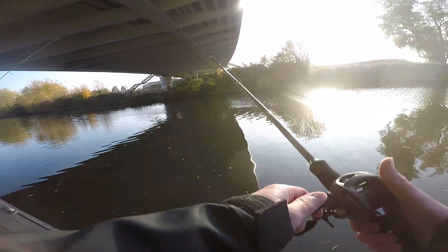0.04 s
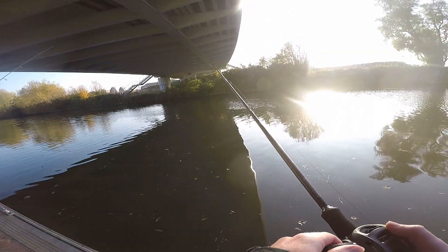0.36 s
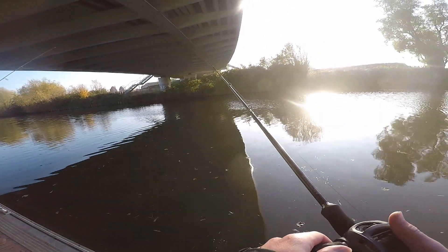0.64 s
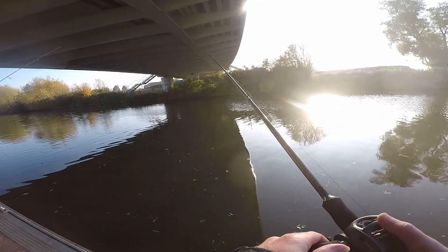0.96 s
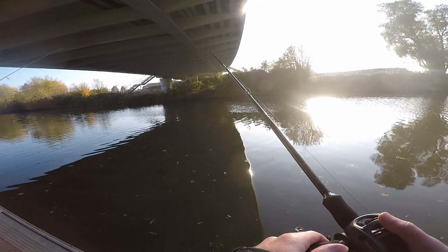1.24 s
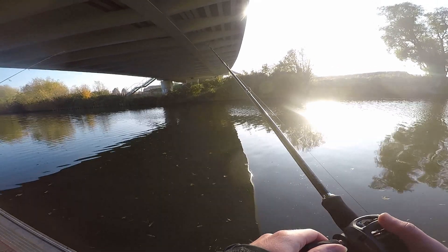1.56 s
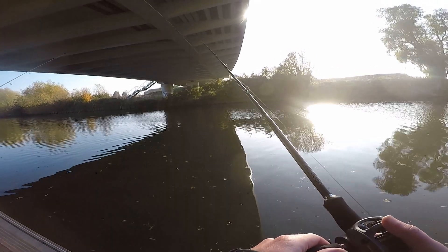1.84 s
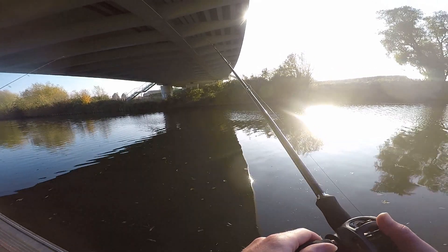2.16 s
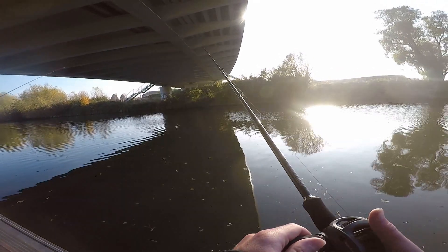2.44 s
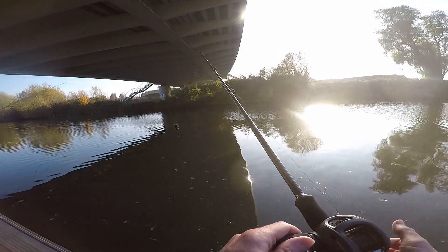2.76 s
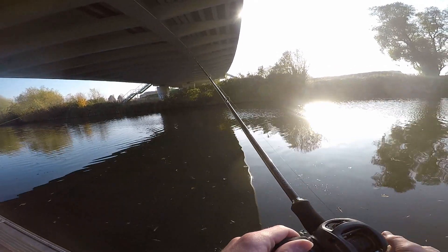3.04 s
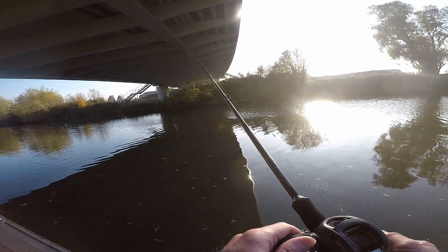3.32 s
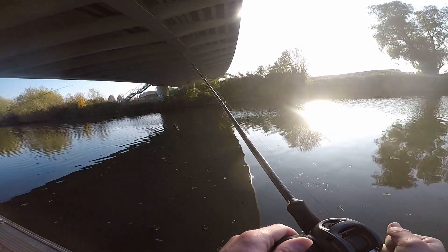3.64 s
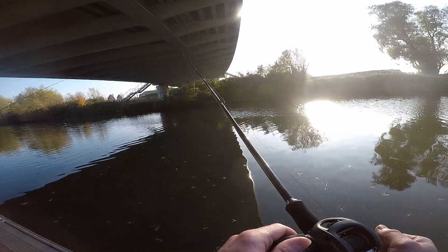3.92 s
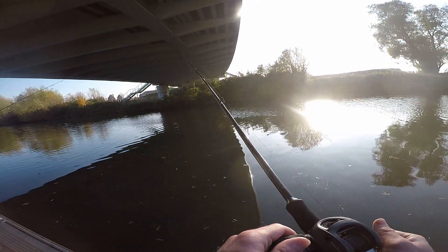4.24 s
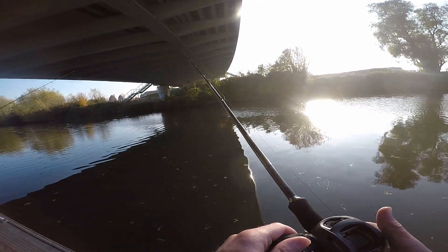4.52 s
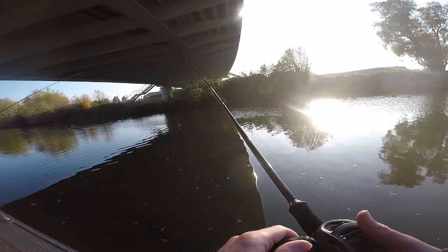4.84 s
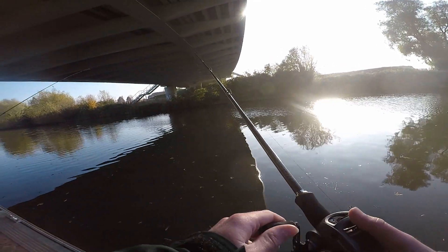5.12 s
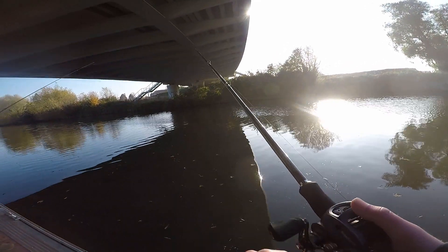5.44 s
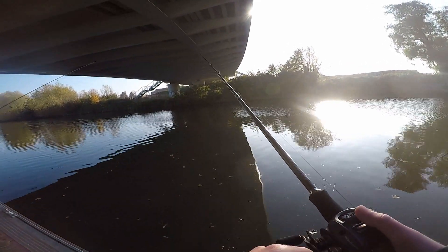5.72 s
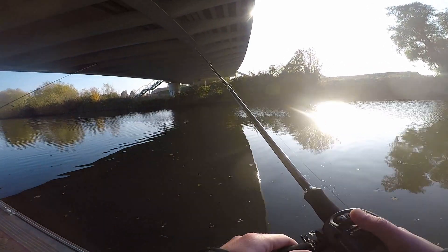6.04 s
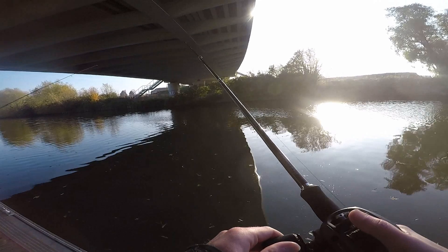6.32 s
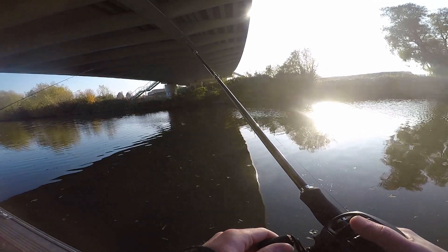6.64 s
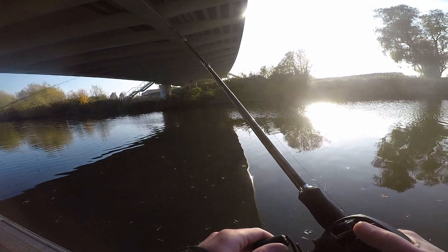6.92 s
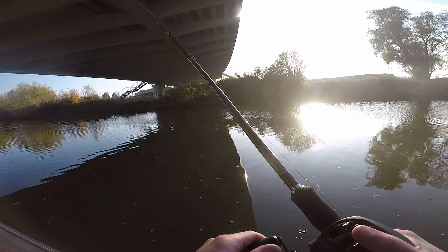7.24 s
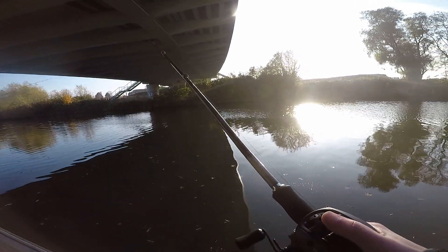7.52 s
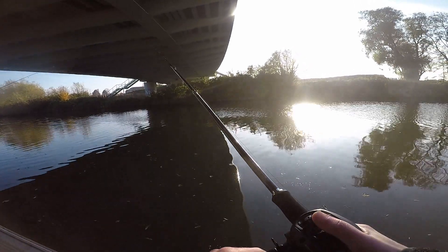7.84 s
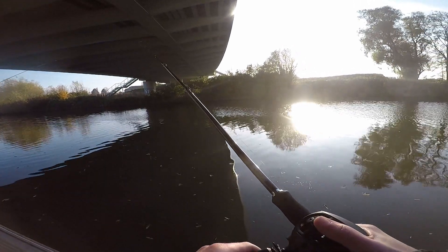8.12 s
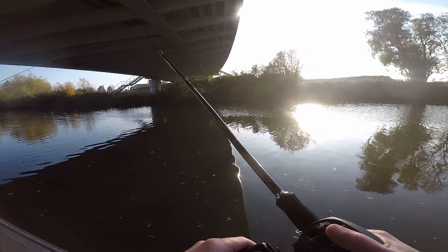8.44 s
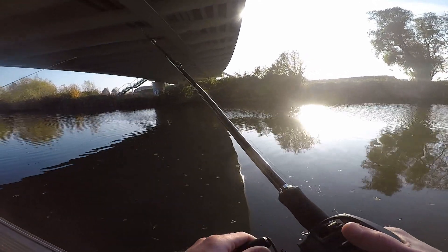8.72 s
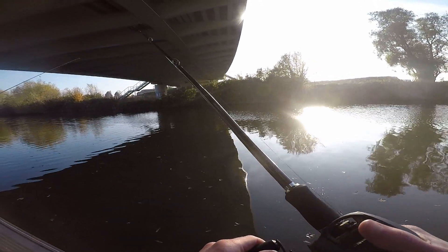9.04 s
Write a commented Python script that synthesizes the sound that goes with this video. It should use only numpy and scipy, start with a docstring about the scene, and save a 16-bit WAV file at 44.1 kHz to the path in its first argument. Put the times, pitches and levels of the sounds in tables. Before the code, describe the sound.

Traffic on a bridge overhead makes a dark, continuous roar, with a wavering low diesel drone and soft buffeting on a body-worn microphone. In the first half second a hand knocks and slides on a fishing rod grip. Small, close reel clicks come near 0.3, 0.8, 1.7, 2 and 2.6 seconds, with faint sleeve rustle until about 6 seconds. From 3 seconds vehicles cross one after another in gentle swells with light tyre hiss, while the diesel growls most around 3 and 6 seconds. A short rub and click come at 5.7 seconds. From 6 to 8 seconds dull thumps and rumble shake the microphone, loudest near 6.9 seconds, making the traffic dip and slowly return. The reel ticks softly around 7.4 to 8.2 seconds. The diesel sinks in pitch and fades as another vehicle passes, with one more thud near 9 seconds.

```python
"""Under a road bridge beside a canal, traffic roars on the deck and a diesel engine drones.
An angler wears the camera: the rod grip knocks, then low buffeting, sleeve rustle and small reel
clicks play close to its two microphone ports. From about 3 s, vehicles cross overhead one by one.
Around 7 s, bumps on the housing push the gain control down, and the traffic slowly creeps back
while the diesel sinks in pitch and leaves."""
import sys
import numpy as np
from scipy import signal
from scipy.fft import rfft, irfft
from scipy.io import wavfile
from scipy.ndimage import uniform_filter1d, minimum_filter1d

SR = 44100
rng = np.random.default_rng(int(sys.argv[2]) if len(sys.argv) > 2 else 0)


def log_audio(samples):
    """Write samples as a 16-bit WAV file to the path given in sys.argv[1]."""
    # one column per channel
    frames = np.atleast_2d(samples).T
    # limit to full scale, then quantise
    limited = np.clip(frames, -1, 1)
    pcm = np.round(limited * 32767).astype(np.int16)
    wavfile.write(sys.argv[1], SR, pcm)


N = 409248
T = np.arange(N) / SR
FREQS_HZ = np.fft.rfftfreq(N, 1 / SR)


def amp(db):
    """Decibels to gain."""
    return 10 ** (np.asarray(db) / 20)


def unit(x):
    """Scales to rms 1."""
    return x / np.sqrt(np.mean(x ** 2) + 1e-20)


def curve_at(points, hz):
    """Reads a curve along a log-frequency axis."""
    freqs, values = np.transpose(points)
    return np.interp(np.log(hz + 1), np.log(freqs + 1), values)


def add(mix, start_s, sound):
    """Lays a sound into the mix."""
    part = mix[..., round(start_s * SR):][..., :sound.shape[-1]]
    part += sound[..., :part.shape[-1]]


def shaped_noise(gains):
    """Mono noise of rms 1, coloured by a gain at each frequency."""
    return unit(irfft(rfft(rng.standard_normal(N)) * gains, N))


def drift(rate_hz):
    """A smooth random wobble of rms 1."""
    return shaped_noise(np.exp(-.5 * (FREQS_HZ / rate_hz) ** 2))


def band(low_hz, high_hz):
    """A noise band of rms 1, unrelated in the two ports."""
    bandpass = signal.butter(2, [low_hz, high_hz], "band", fs=SR, output="sos")
    return unit(signal.sosfilt(bandpass, rng.standard_normal((2, N))))


def eased(gain):
    """Rounds off a gain curve over a few milliseconds."""
    return uniform_filter1d(uniform_filter1d(gain, size=250), size=250)


def bell(peak_s, half_s):
    """A smooth rise and fall, 1 at its peak."""
    return np.exp(-((T - peak_s) / half_s) ** 2)


def swells(rows, rest_db):
    """Gain of bell-shaped swells over a resting level; their powers add."""
    power = sum((amp(db) * bell(peak_s, half_s)) ** 2 for peak_s, half_s, db in rows)
    return np.sqrt(amp(rest_db) ** 2 + power)


def strike(modes, tilt_db, scuff_s, lowpass_hz, order=4, size=8000):
    """A short scuff rings damped modes; a harder touch tilts them brighter. Peak 1."""
    t = np.arange(size) / SR
    ring = np.zeros(size)
    for hz, db, t60_s in modes:
        decay = amp(db + tilt_db * np.log2(hz) - 60 * t / t60_s)
        ring += decay * np.sin(2 * np.pi * hz * rng.uniform(.96, 1.04) * t)
    push = rng.standard_normal(size) * np.exp(-t / scuff_s) / np.sqrt(SR / 400)
    push[0] = 1  # first contact
    lowpass = signal.butter(order, lowpass_hz, fs=SR, output="sos")
    hit = signal.sosfilt(lowpass, signal.fftconvolve(ring, push)[:size])
    return hit / abs(hit).max()


# how alike the two ports sound: freq_hz, likeness (0-1)
PORT_LIKENESS = [(150, 1), (300, .994), (550, .975), (850, .79), (1500, .67), (2000, .48), (2350, .15),
                 (3000, .62), (4000, .58), (5000, .15), (6200, .4), (10000, .1)]
# phase between the ports: freq_hz, left_lead_rad
PORT_PHASE = [(120, 0), (300, -.12), (620, -.3), (950, 1.35), (1600, 1.7), (2250, 1.4), (2500, -.3),
              (4300, 0), (5200, 2.7), (10000, 2.6)]
# stereo lean: freq_hz, left_minus_right_db
PORT_BALANCE = [(200, 0), (320, -1), (490, -3.5), (740, -10), (1130, -5.5), (1700, 1.8), (2050, 4),
                (2700, .5), (7000, 0), (9000, -3), (13000, 0)]
def airborne(spectrum, patchy_db, size=1024):
    """Noise of rms 1 with drifting patches of colour, as the two ports pick it up."""
    hop, hz = size // 4, np.fft.rfftfreq(size, 1 / SR)
    draws = rng.standard_normal((5, N // hop + 5, len(hz)))
    left, unrelated = draws[0] + 1j * draws[1], draws[2] + 1j * draws[3]
    patches = unit(uniform_filter1d(uniform_filter1d(draws[4], size=14, axis=0), size=7, axis=1))
    likeness = np.clip(curve_at(PORT_LIKENESS, hz), 0, 1)
    right = likeness * left + np.sqrt(1 - likeness ** 2) * unrelated
    right *= np.exp(-1j * curve_at(PORT_PHASE, hz))
    lean = amp(curve_at(PORT_BALANCE, hz) / 2)
    ports = np.array([left * lean, right / lean]) * amp(curve_at(spectrum, hz) + patchy_db * patches)
    _, noise = signal.istft(ports, nperseg=size, noverlap=size - hop, time_axis=1, freq_axis=2)
    return unit(noise[:, :N])


# colour of the noise floor: freq_hz, level_db
HISS_EQ = [(1000, -6), (5000, -0.5), (8000, 4.5), (10000, 1.5), (11300, -5), (12500, -12), (14000, -33)]
def electronics(frame_hz=59.94, whine_hz=8515):
    """The camera hisses, and a thin fuzzy whine pulses once per picture frame, mostly on the right."""
    pulse = (.5 + .5 * np.cos(2 * np.pi * frame_hz * T)) ** 2
    whine = unit(pulse * np.sin(2 * np.pi * whine_hz * T + 1.3 * drift(45)))
    return amp([[-80], [-65.5]]) * whine + amp(-62) * airborne(HISS_EQ, patchy_db=0)


# colours of the deck's roar, the tyre wash and the tread hiss: freq_hz, level_db
ROAR_EQ = [(60, 3), (140, -4), (200, -2), (270, -1.5), (370, -1.5), (490, -1), (580, -7), (800, -22.5),
           (1100, -37), (2300, -42.5), (9000, -75)]
TYRE_EQ = [(400, 2.5), (800, 6.5), (1100, 0), (1400, -3.5), (1800, -7.5), (2350, -20), (3200, -25),
           (4500, -38.5), (9000, -49)]
TREAD_EQ = [(900, 1), (1800, 7), (2350, -3.5), (3100, -1.5), (3700, -6), (4400, -10), (8000, -20.5),
            (12000, -38)]
# vehicles crossing overhead: nearest_s, roar_db, tyre_db, tread_db
PASS_BYS = [(2.95, -26, -47.5, -56.5), (4.05, -26.5, -53.5, -55), (5.1, -26.5, -51.5, -50),
            (5.901, -23, -47, -49), (7.5, -23, -47, -50.5), (8.821, -20, -44.5, -58.5)]
def traffic(distance_m=7.44, speed_m_per_s=15.1):
    """The deck radiates a dark roar that swells as each vehicle nears; tyres spill over the parapet."""
    power = amp([[-25.5], [-37], [-72.5]]) ** 2  # steady roar, tyres and tread further along the road
    for nearest_s, *levels_db in PASS_BYS:
        nearness = distance_m / np.hypot(distance_m, speed_m_per_s * (T - nearest_s))
        power = power + np.outer(amp(levels_db), nearness) ** 2
    roar, tyres, tread = np.sqrt(power)
    return (roar * airborne(ROAR_EQ, patchy_db=1)
            + tyres * airborne(TYRE_EQ, patchy_db=-.05)
            + tread * airborne(TREAD_EQ, patchy_db=1.7))


# level ride of the drone's two notes: time_s, lower_db, upper_db
DRONE_RIDE = [(0, -21, -30), (.4, -20, -28), (.55, -20, -19), (1.4, -18, -23), (2.5, -16.5, -23.5),
              (3.4, -16.5, -20), (4.15, -14.5, -21.5), (4.6, -17.5, -17), (5.15, -18, -14),
              (5.8, -16.5, -17.5), (6.3, -19, -26), (8.1, -20, -27), (9.25, -34, -38)]
# brief dips in one note: centre_s, half_length_s, gain_db, engine_order
DRONE_DIPS = [(1.25, .06, -8, 3), (1.65, .1, -12, 4), (1.93, .08, -12, 4), (2.5, .1, -15, 4),
              (2.78, .06, -7, 3), (3.05, .12, -13, 3), (3.65, .1, -12, 4), (3.9, .07, -15, 3),
              (4.85, .08, -7, 4), (5.05, .09, -14, 3), (5.35, .13, -20, 3), (5.45, .04, -5, 4),
              (5.69, .04, -7, 4), (6, .09, -10, 3), (6.2, .15, -13, 4)]
def diesel_drone(cycle_phase, orders=(3, 4), waver_db=2.1):
    """Two low engine orders; echoes make each swell and fade as the diesel moves along the deck."""
    times_s, *rides_db = np.transpose(DRONE_RIDE)
    out = np.zeros(N)
    for order, ride_db in zip(orders, rides_db):
        dip_db = sum(db * bell(s, half_s) for s, half_s, db, note in DRONE_DIPS if round(note) == order)
        gain = amp(np.interp(T, times_s, ride_db) + dip_db + waver_db * drift(4.5))
        out += gain * np.sin(order * cycle_phase + .4 * drift(5.5))
    return out


# overtones of the diesel: engine_order, level_db
GROWL_PARTIALS = [(6, -9), (7, -1), (8, -1.5), (9, -7), (12, -4.5), (16, -8)]
# swells of the growl: peak_s, half_length_s, level_db, favoured_order
GROWL_SWELLS = [(1.6, 0.34, -39, 7), (2.243, .22, -36.5, 7), (2.58, 0.29, -29.5, 16),
                (2.85, 0.32, -33.5, 9), (3.202, 0.35, -30.5, 8), (4.55, 0.42, -39.5, 8),
                (5.45, .25, -31, 12), (5.82, 0.41, -31, 12), (6.155, 0.27, -31.5, 8), (6.5, 0.21, -33.5, 7),
                (7.586, 0.28, -31.5, 8)]
def diesel_growl(cycle_phase, favour_db=7.5, waver_db=3.15, smear_rad=.09):
    """The overtones swell together, and each time the echoes favour one."""
    out = np.zeros(N)
    for order, level_db in GROWL_PARTIALS:
        rows = [(peak_s, half_s, db + favour_db * (round(favoured) == round(order)))
                for peak_s, half_s, db, favoured in GROWL_SWELLS]
        gain = swells(rows, rest_db=-40) * amp(level_db + waver_db * drift(9.8))
        out += gain * np.sin(round(order) * cycle_phase + order * smear_rad * drift(5))
    return out


def diesel(cycle_hz=26.26, leaves_s=6.9, sag_hz_per_s=.35):
    """One engine drives drone and growl; it holds its speed, then its pitch sinks as it leaves."""
    speed_hz = cycle_hz - sag_hz_per_s * np.maximum(T - leaves_s, 0)
    cycle_phase = 2 * np.pi * np.cumsum(speed_hz * (1 + .0029 * drift(1.66))) / SR
    return np.sqrt(2) * (diesel_drone(cycle_phase) + diesel_growl(cycle_phase))


# colours of the housing's rumble and the mount's scrape: freq_hz, level_db
RUMBLE_EQ = [(5, -29.5), (16, 2), (28, 0), (48, -1.5), (64, -3), (85, -10), (115, -15.5), (180, -26),
             (300, -35), (600, -50.5), (1500, -94.5), (4000, -120)]
SCRAPE_EQ = [(50, -10.5), (95, 4.5), (180, 8), (280, -8), (450, -21), (1000, -64), (4000, -120)]
# the angler shifts, rocking the camera: peak_s, half_length_s, rumble_db, scrape_db
BODY_MOVES = [(0.172, 0.033, -9.5, -19.5), (1.12, 0.06, -11, -30), (6.2, 0.26, -18, -29),
              (6.68, 0.09, -7, -14), (6.85, .07, -4, -21), (7.03, .07, -5, -24), (7.19, .08, -4, -11),
              (7.34, .05, -4, -18), (7.49, 0.06, -2, -19), (7.88, 0.1, -6, -17), (8.01, .045, 0, -22),
              (8.11, .04, -4, -27), (8.73, .1, -24, -25), (8.9, .055, -7, -29), (9.01, 0.035, -7, -19),
              (9.19, 0.065, -4.5, -42)]
def buffeting():
    """Lumpy sub-bass shakes the housing and the mount scrapes, both centred; air stirs at each port."""
    shaking = swells([(s, half_s, db) for s, half_s, db, _ in BODY_MOVES], rest_db=-16)
    scraping = swells([(s, half_s, db) for s, half_s, _, db in BODY_MOVES], rest_db=-41)
    rumble = shaped_noise(amp(curve_at(RUMBLE_EQ, FREQS_HZ)))
    scrape = shaped_noise(amp(curve_at(SCRAPE_EQ, FREQS_HZ)))
    rumble /= np.sqrt(uniform_filter1d(rumble ** 2, size=6000))  # no long lulls between buffets
    air = amp(-24.5) * band(22, 140)
    return shaking * amp(.2 * drift(13)) * (rumble + air) + scraping * amp(2 * drift(3.5)) * scrape


# colour of the cloth: freq_hz, level_db
CLOTH_EQ = [(1500, -15), (3000, -7), (4300, -8), (5400, -2), (6300, 0), (7500, -4), (8200, -10.5),
            (10000, -14), (13000, -22)]
# strokes of the sleeve: peak_s, half_length_s, level_db
SLEEVE_STROKES = [(.1, 0.48, -52.5), (.7, 0.32, -55), (1.3, 0.14, -58), (1.98, 0.021, -53),
                  (2.185, 0.044, -53.5), (2.29, 0.087, -54), (2.57, 0.12, -54.5), (2.72, 0.068, -57),
                  (2.85, 0.055, -52.5), (3.06, 0.27, -56.5), (4.83, .18, -56.5), (5.3, 0.38, -63),
                  (5.68, 0.15, -56), (6.07, 0.073, -54.5)]
def sleeve_rustle():
    """The sleeve brushes the jacket with a bright flutter, never quite still."""
    gain = swells(SLEEVE_STROKES, rest_db=-61.5) * amp(2 * drift(25))
    return gain * airborne(CLOTH_EQ, patchy_db=.6)


# slides of the hand: peak_s, half_length_s, level_db, low_hz, high_hz
HAND_SLIDES = [(0.272, 0.078, -40, 550, 1700), (.75, 0.095, -53, 2200, 5500), (0.767, .04, -59, 3750, 4100),
               (2.185, .018, -59, 4600, 5700), (5.69, .025, -43.5, 1400, 2470)]
def hand_slides():
    """The hand rubs over grip and reel in short swishes of friction noise."""
    return sum(amp(db) * bell(peak_s, half_s) * band(low_hz, high_hz)
               for peak_s, half_s, db, low_hz, high_hz in HAND_SLIDES)


# ring of the reel body: pitch_hz, level_db, t60_s
REEL_MODES = [(900, 10, .01), (1400, 1, .009), (1930, 7, .011), (2150, -6, .012), (3150, -5, .011),
              (3600, -8, .008), (4300, -8, .006), (4850, -5, .007), (5500, -5.5, .007), (6800, -9, .005)]
# clicks and ticks: start_s, level_db, ring_hz, scuff_s, lowpass_hz
REEL_CLICKS = [(.2865, -21, 3200, .0007, 6000), (.8185, -23.5, 1400, .003, 5600),
               (1.662, -27.5, 3600, .001, 3700), (1.961, -33, 2100, .004, 7200),
               (1.993, -21, 1950, .0012, 7200), (2.616, -21, 3150, .001, 7000),
               (2.658, -24.5, 3300, .001, 6800), (3.452, -31, 3200, .002, 6500),
               (3.685, -30, 1700, .002, 5500), (5.698, -26.5, 1600, .004, 4800),
               (7.357, -26.5, 2300, .001, 2700), (7.668, -30, 2300, .002, 5000),
               (7.821, -30.5, 2200, .002, 4000), (7.848, -31.5, 1700, .004, 3000),
               (7.918, -33, 2500, .004, 4000), (8.139, -31.5, 4000, .003, 4500),
               (8.161, -31, 2300, .002, 5000)]
def reel_clicks(ring_db=7.5, ring_octaves=.17, tilt_db=3, pan_left_db=5):
    """The reel clicks under the thumb, then ticks softly as it is wound."""
    out = np.zeros((2, N))
    pan_db = np.array([[pan_left_db], [-pan_left_db]]) / 2
    for start_s, level_db, ring_hz, scuff_s, lowpass_hz in REEL_CLICKS:
        # the place touched brings out the modes near ring_hz
        modes = [(hz, db + ring_db * np.exp(-(np.log2(hz / ring_hz) / ring_octaves) ** 2), t60_s)
                 for hz, db, t60_s in REEL_MODES]
        ports = np.array([strike(modes, tilt_db, scuff_s, lowpass_hz) for _ in range(2)])
        add(out, start_s, amp(level_db + pan_db) * ports)
    return out


# ring of the rod grip: pitch_hz, level_db, t60_s
GRIP_MODES = [(300, 4, .025), (520, 3, .025), (720, 5, .022), (860, 5.5, .02), (1120, 0, .016),
              (1500, -2, .012), (1880, -1, .013)]
# knocks on the grip: start_s, level_db, tilt_db_per_octave, scuff_s, lowpass_hz
GRIP_KNOCKS = [(.0975, -8, -4, .0007, 2100), (.214, -16, -5, .012, 950), (.2405, -6.5, -2.5, .002, 2000),
               (.268, -22, 0, .01, 2100), (.300, -14.5, -7, .005, 950), (.325, -20, -6, .012, 900)]
def grip_knocks():
    """The hand shifts on the rod and knocks its grip, right of centre."""
    out = np.zeros((2, N))
    for start_s, db, tilt_db, scuff_s, lowpass_hz in GRIP_KNOCKS:
        knock = strike(GRIP_MODES, tilt_db, scuff_s, lowpass_hz, order=8)
        add(out, start_s, amp([[db - 6], [db]]) * knock)
    return out


# ring of the camera housing: pitch_hz, level_db, t60_s
HOUSING_MODES = [(62, 13, 0.075), (119, 17, 0.055), (188, 8, 0.035), (285, 3, 0.04), (404, -12, .08),
                 (450, 3, 0.045), (550, -7, .025)]
# bumps on it: start_s, level_db, tilt_db_per_octave, lowpass_hz
HOUSING_BUMPS = [(0.177, -4, -2, 260), (6.012, -6, 5, 400), (6.272, -9, 5, 350), (6.378, -2, 5, 300),
                 (6.413, -6, 3, 320), (6.514, -9, 1, 350), (6.67, 1, 4, 220), (6.729, 1, 5, 330),
                 (6.765, -5, 6, 480), (6.838, 3, -3, 250), (6.851, -2, 5, 350), (6.8975, 10, 13, 550),
                 (6.903, 4, 5, 330), (7.005, 0, 0, 180), (7.128, 3, 5, 260), (7.172, 3, 1, 190),
                 (7.228, 4, 2, 220), (7.32, 2, -5, 150), (7.465, 3, -12, 120), (7.822, -4, -1, 190),
                 (7.892, -1, 2, 200), (7.92, 0, -4, 160), (7.991, 0, -2, 180), (8.1, -2, -7, 130),
                 (8.495, -8, -4, 130), (9.005, -3, 0, 180)]
def housing_bumps():
    """Bumps ring the housing's low modes: dull thuds, alike in both ports."""
    out = np.zeros(N)
    for start_s, db, tilt_db, lowpass_hz in HOUSING_BUMPS:
        thud = strike(HOUSING_MODES, tilt_db, scuff_s=.0005, lowpass_hz=lowpass_hz, order=6)
        add(out, start_s, amp(db) * thud)
    return out


def scene():
    """The bridge ambience, the angler's close sounds and the noise floor, in stereo."""
    bridge = traffic() + diesel()
    angler = buffeting() + sleeve_rustle() + hand_slides() + reel_clicks() + grip_knocks()
    return bridge + angler + housing_bumps() + electronics()


def record(dry, threshold_db=-8, attack_db_per_s=35, recovery_db_per_s=10.5, ceiling=.85, top_hz=14300):
    """Gain control ducks on loud bumps and recovers slowly; a limiter and a steep high cut follow."""
    level_db = 10 * np.log10(abs(uniform_filter1d((dry ** 2).mean(0), size=600)) + 1e-12)
    recovery_ramp, attack_ramp = T * recovery_db_per_s, T * attack_db_per_s
    held_db = np.maximum.accumulate(level_db + recovery_ramp) - recovery_ramp
    over_db = np.maximum(held_db - threshold_db, 0)
    duck_db = np.minimum.accumulate(over_db - attack_ramp) + attack_ramp
    ducked = dry / amp(eased(duck_db))
    limiter_gain = np.minimum(ceiling / (abs(ducked).max(0) + 1e-9), 1)
    limited = ducked * eased(minimum_filter1d(limiter_gain, size=500))
    end_fades = signal.windows.tukey(N, .002)
    high_cut = signal.firwin(511, top_hz, window=("kaiser", 9), fs=SR)
    return signal.oaconvolve(limited * end_fades, high_cut[None], "same")


dry = scene()
out = record(dry)
log_audio(out)
```